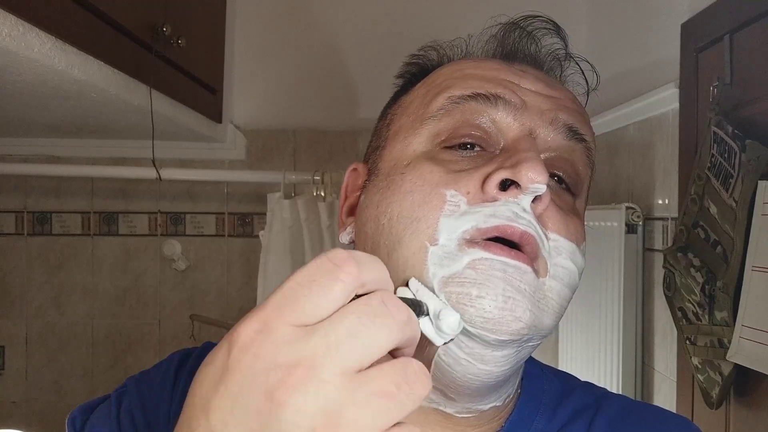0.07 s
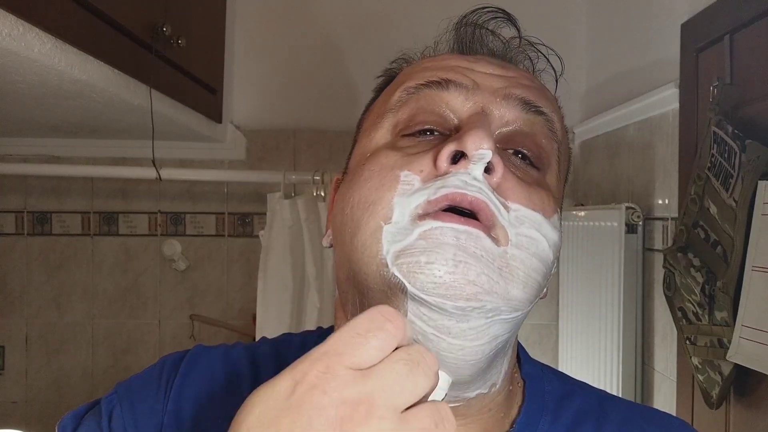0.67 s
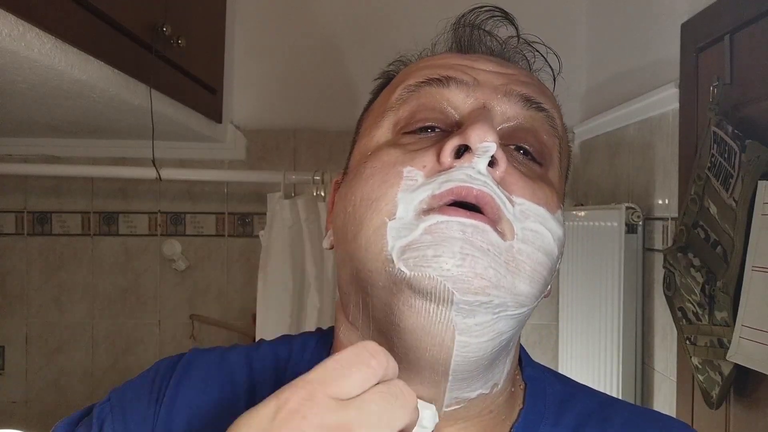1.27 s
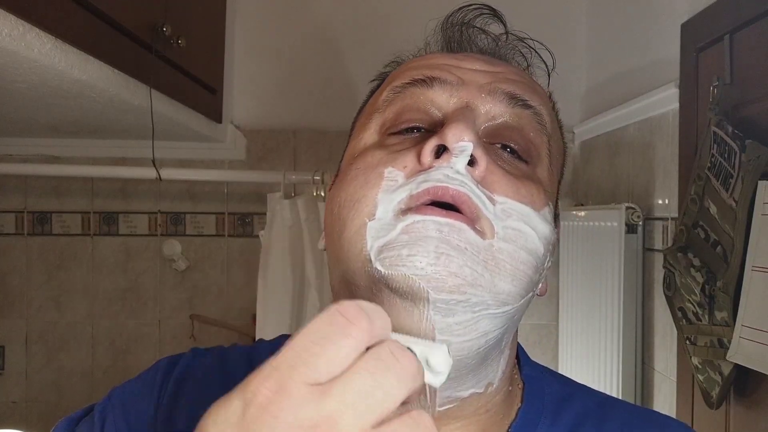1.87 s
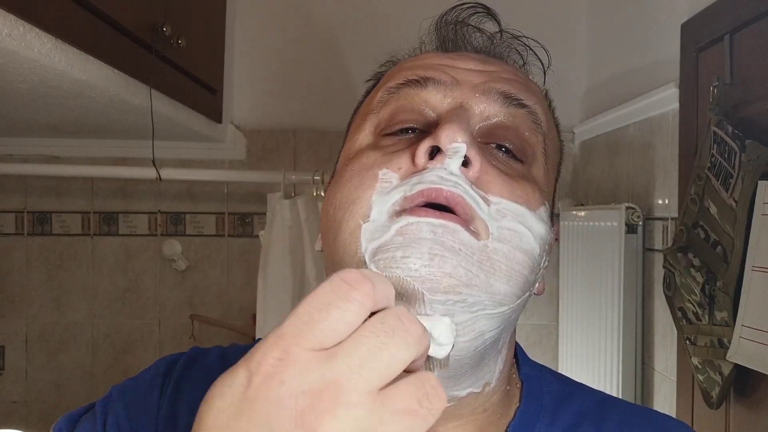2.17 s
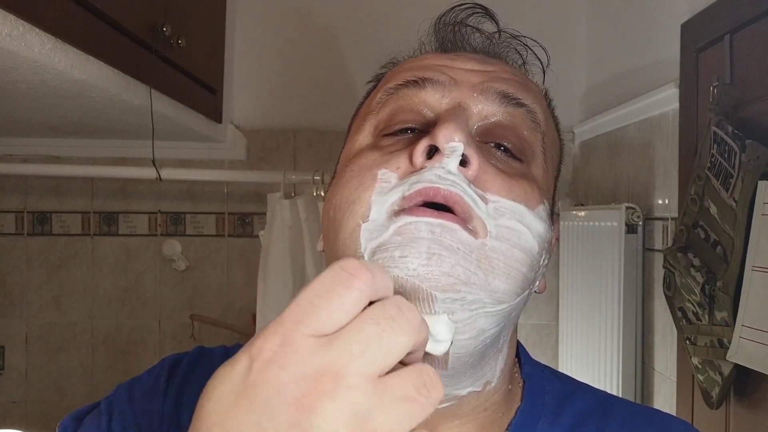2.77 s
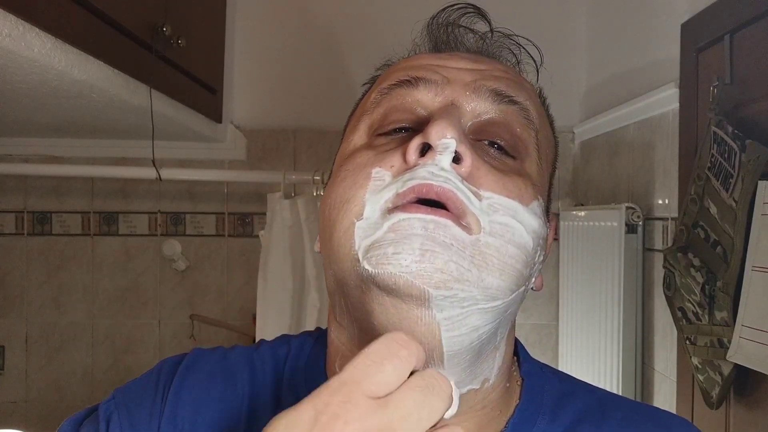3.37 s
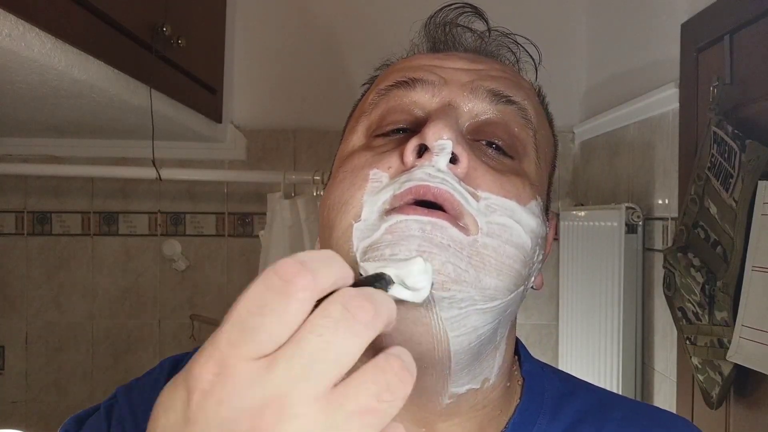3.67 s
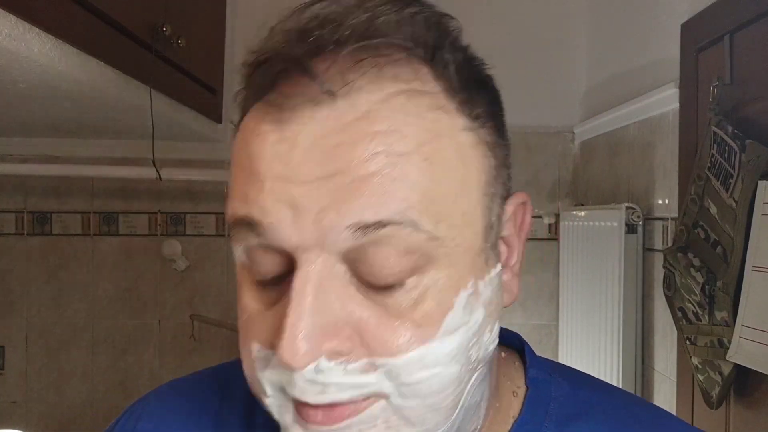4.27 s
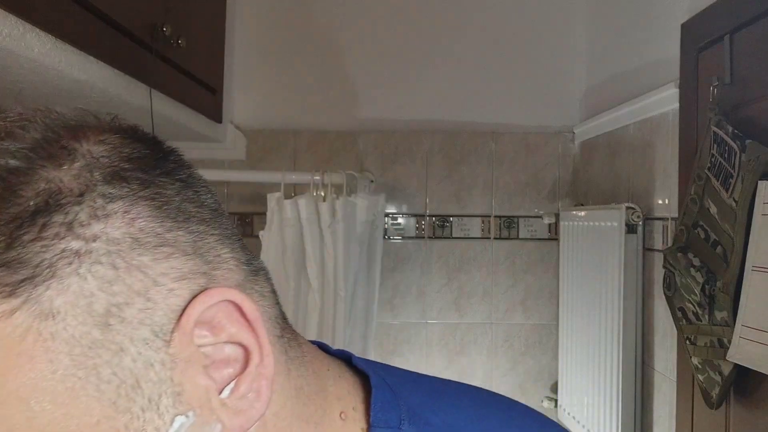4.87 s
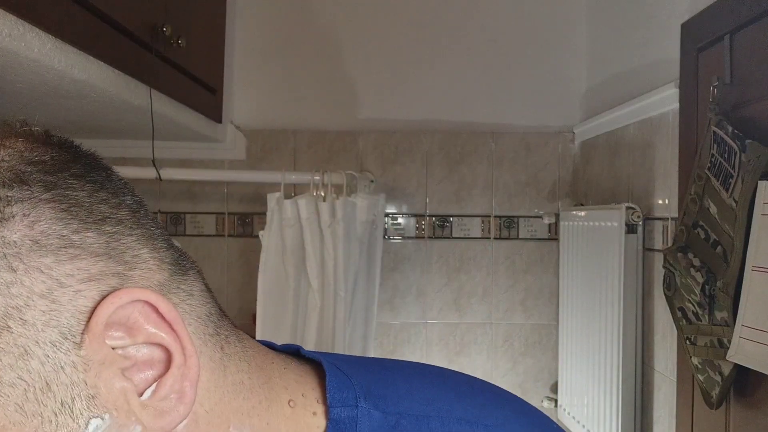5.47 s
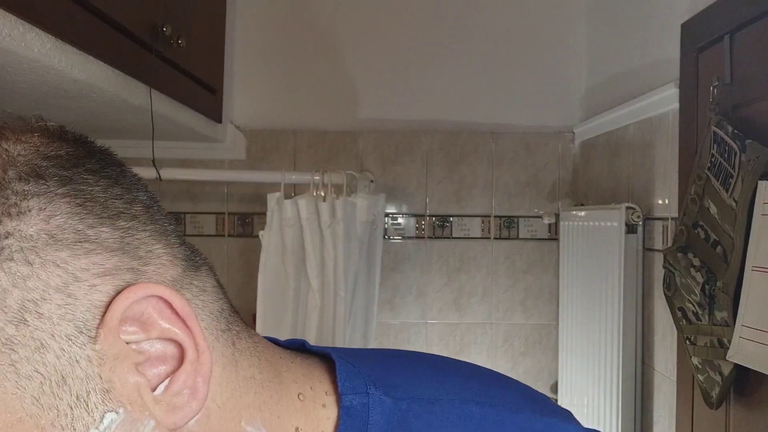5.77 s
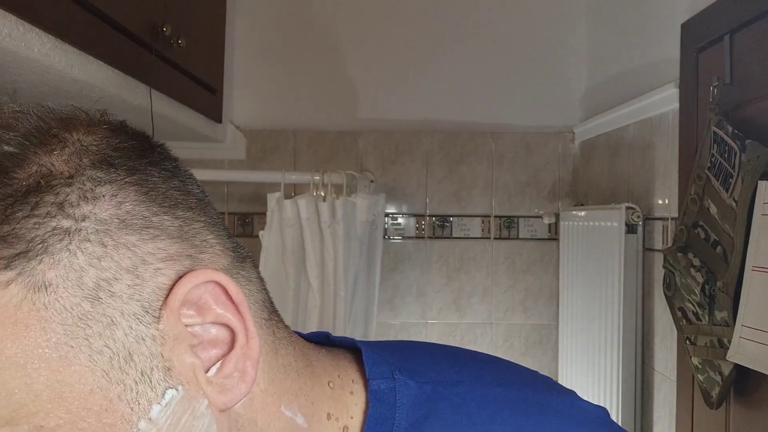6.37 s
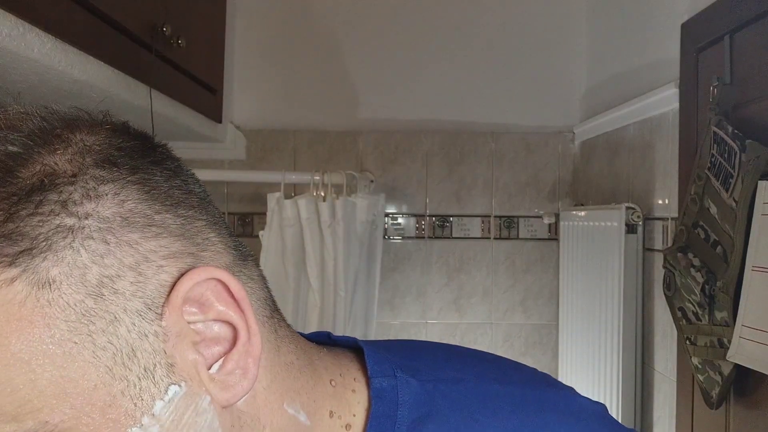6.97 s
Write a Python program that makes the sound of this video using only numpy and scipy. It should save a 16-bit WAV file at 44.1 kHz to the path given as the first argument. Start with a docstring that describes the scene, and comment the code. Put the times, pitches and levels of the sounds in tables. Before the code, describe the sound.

Close, short razor strokes rasp over stubble, followed by a few bumps on a basin and a hissing, spattering tap.

```python
"""In a small tiled bathroom, a razor scrapes through foam and stubble close to a phone's microphone.
Stick-slip friction gives the scrape, and snapping whiskers excite the resonances of the blades.
The hand swings away, pushing air at one microphone port; the shirt rustles and bumps ring the basin.
Then the tap is knocked open: the aerated jet hisses, spatters off the razor and traps air that
gurgles as it oscillates. Reflections from the tiles add a short reverberation."""
import sys
import numpy as np
from scipy import signal
from scipy.fft import rfft, irfft
from scipy.io import wavfile
from scipy.ndimage import uniform_filter1d

SR = 44100
rng = np.random.default_rng(int(sys.argv[2]) if len(sys.argv) > 2 else 0)


def bounce(signal):
    """Save signal as a 16-bit WAV file at the path given by the first command-line argument."""
    frames = np.transpose(np.atleast_2d(signal))
    limited = np.clip(frames, -1, 1)
    pcm = np.round(limited * 32767).astype(np.int16)
    wavfile.write(sys.argv[1], SR, pcm)


N = 309141
T = np.arange(N) / SR
MID_HZ, HIGH_HZ = (2000, 5000), (6000, 9000)  # bands in which noise levels are set
TAP_LEAK_S, TAP_OPEN_S, TAP_FULL_S = 5.05, 5.083, 5.212

# Spectral envelopes of the noises and ticks: f/Hz, level/dB
MURMUR_SPECTRUM = [(25, -23.5), (50, -19.5), (90, 0), (220, -0.5), (500, -6.5), (900, -15.5), (1500, -25.5),
                   (2800, -29.5), (4400, -29.5), (5400, -33), (6800, -30), (8200, -33.5), (12200, -37),
                   (15200, -29.5)]
CLOTH_SPECTRUM = [(400, 9), (900, 7.5), (1600, 0.5), (2400, -5), (3700, -1), (4500, -.5), (5500, -8.5),
                  (7000, 2), (8300, -4.5), (12200, -15), (15200, -13)]
SLEEVE_SPECTRUM = [(400, 6), (900, -3), (1600, -1), (2500, 0), (3600, 1.5), (4500, 0), (5500, -10.5),
                   (7000, 0), (8300, -10), (12200, -21), (15200, -18)]
JET_SPECTRUM = [(60, -27), (120, -18), (400, -2), (650, -4), (950, -3.5), (1550, -9), (2200, -2.5),
                (3200, -2), (4500, -2.5), (5000, -5.5), (5800, -6), (6500, 2.5), (7500, 0.5), (7900, 0.5),
                (8400, -7.5), (12400, -9), (14200, 0), (15600, -8.5)]
SPRAY_SPECTRUM = [(1500, -21), (3500, -0.5), (5300, -4.5), (6400, 6.5), (7600, 1), (8500, 2), (12000, -31),
                  (15000, -5)]
SPLASH_SPECTRUM = [(1500, -24), (2300, -7.5), (3100, -3), (4300, 1), (5300, -11), (9000, -21)]
TICK_SPECTRUM = [(1500, -20), (2700, -19), (3300, -10), (4000, -10), (4500, 1), (5400, 1), (6600, 4),
                 (7700, 4), (8600, -11), (13000, -22)]
DRAG_SPECTRUM = [(150, -5), (400, 3.5), (700, 0), (1050, -4.5), (1800, -2), (2500, -4), (3400, -1),
                 (4500, -1.5), (5400, -6.5), (6800, 1), (8200, -1), (12200, -7), (15200, -6.5)]
# Partials of the room's hum: f/Hz, level/dB
HUM_PARTIALS = [(102, -80), (221, -70.5), (371, -105), (500, -76.5)]
# Shirt rustles as the arm drops and the body bends: t/s, duration/s, level/dB
SHIRT_RUSTLES = [(3.79, 0.46, -66), (4.248, 0.19, -71), (4.477, .12, -68), (4.62, 0.27, -72.5)]
# Gusts from the moving hand: t/s, level/dB
HAND_GUSTS = [(1.743, -30), (1.776, -34), (1.819, -34), (1.977, -32.5), (4.129, -33.5), (4.144, -35),
              (4.176, -31.5), (4.196, -38), (4.292, -31), (4.301, -34.5)]
# Bumps on the basin and tap lever: t/s, level/dB, cutoff f/Hz
BASIN_BUMPS = [(4.489, -45.5, 750), (4.528, -38.5, 520), (4.553, -43.5, 398), (4.574, -42, 330),
               (4.603, -48, 232), (4.698, -55, 1200), (5.049, -44.5, 500), (5.064, -43, 330),
               (5.088, -48, 1000)]
# Slides of the hand on basin and lever: t/s, duration/s, level/dB, f/Hz
HAND_RUBS = [(4.488, 0.012, -54, 740), (4.53, .08, -51.5, 200), (4.53, .06, -56.5, 560),
             (4.697, .014, -52, 704), (4.72, .06, -64, 755)]
# Normal modes of the basin: f/Hz, level/dB, T60/s
BASIN_MODES = [(149, -5, .23), (199, -1, 0.21), (267, 2, 0.089), (344, -3.5, 0.09), (451, 1, 0.096),
               (590, 5, .04), (670, 2, .05), (750, 9, .038), (970, -4, .035)]
# Air pockets dug by the jet in pooled water: t/s, duration/s, level/dB, f/Hz
AIR_POCKETS = [(5.047, .014, -49.5, 610), (5.06, .014, -52, 245), (5.087, .02, -48, 740),
               (5.09, 0.019, -49.5, 983), (5.15, .17, -58.5, 1010), (5.212, .03, -50.5, 300),
               (5.264, 0.021, -47.5, 400), (5.297, 0.061, -48, 314), (5.788, 0.26, -49.5, 283.5),
               (6.001, 0.14, -54.5, 1290), (6.46, 0.14, -54, 200), (6.659, 0.058, -45.5, 196),
               (6.703, 0.041, -51.5, 310), (6.868, 0.15, -48.5, 268), (6.861, 0.15, -52.5, 462)]
# Drops, the loudest at 6.297 s ringing again thrice just after: t/s, level/dB, bubble f/Hz, amplitude ratio of
# smack to ring
DROP_IMPACTS = [(5.217, -27, 4200, .4), (5.231, -28, 2810, .4), (5.238, -28.5, 3800, .4),
                (5.316, -12.5, 7850, .6), (5.319, -20, 6500, 0.5), (5.337, -24, 6860, 0.5),
                (5.342, -22, 6460, .5), (5.349, -17, 8030, 0.5), (5.721, -25, 4000, .3),
                (5.834, -21, 6480, .7), (5.838, -26, 3640, .5), (5.876, -18.5, 7200, 0.2),
                (6.057, -27, 7350, .6), (6.112, -24, 6660, .4), (6.2969, -7, 6380, 0.25),
                (6.2994, -14, 5700, .05), (6.302, -18, 6000, 0.2), (6.315, -17, 6400, 0.2),
                (6.438, -19.5, 3120, 0.5), (6.4715, -21, 6720, 0.7), (6.513, -23.5, 3050, 0.2),
                (6.685, -25, 6597, .4)]
# Spatter as the razor crosses the jet: t/s, duration/s, spray level/dB, splash level/dB
SPATTER_FLURRIES = [(5.209, 0.027, -42, -43), (5.255, .04, -43, -54), (5.325, 0.019, -35.5, -51),
                    (5.822, 0.1, -40.5, -48), (6.052, .035, -41, -45), (6.296, 0.019, -38.5, -42),
                    (6.47, 0.094, -40.5, -44), (6.66, 0.07, -43, -42.5), (6.852, .17, -43.5, -41.5)]
# Contacts of the razor head: t/s, level/dB
HEAD_CONTACTS = [(.184, -27.5), (0.537, -20.5), (.545, -13.5), (.562, -22), (1.105, -37), (1.398, -19.5),
                 (1.407, -18)]
# Resonances of the blades: f/Hz, bandwidth/Hz, level/dB
BLADE_MODES = [(4460, 600, -11), (6280, 260, -2), (6830, 340, 1.5), (7270, 310, -1), (7550, 220, 1),
               (8400, 300, -7)]
# Razor strokes: t/s, duration/s, drag level/dB, cutting level/dB, thickest stubble at (share of
# stroke), its half-width/s, rasp level/dB, rasp f/Hz, landing time/s
RAZOR_STROKES = [(-.2, .28, -58.5, -50.5, 1, .15, -60, 2470, .023),
                 (0.117, 0.36, -68.5, -71, 0.37, 0.11, -82, 2080, 0.021),
                 (0.669, 0.32, -55.5, -44.5, 0.75, 0.062, -60, 2120, 0.042),
                 (1.433, .32, -54.5, -43.5, 0.81, 0.079, -70, 3600, 0.073),
                 (2.066, 0.24, -55.5, -46, .78, 0.08, -67, 3400, 0.024),
                 (2.658, 0.26, -55, -41.5, .82, 0.029, -83, 3130, 0.044),
                 (3.396, .27, -55.5, -44, 0.88, 0.044, -72, 3160, 0.028)]
# Microphone response, with a deep treble notch: f/Hz, level/dB
MIC_RESPONSE = [(20, 2), (8400, 1.5), (8900, -4.5), (9400, -22), (10000, -29), (11150, -49), (11650, 4),
                (16000, 0)]
# Its narrow peaks and dips: f/Hz, bandwidth/Hz, level/dB
MIC_RESONANCES = [(2077, 76, 1.5), (2440, 420, -2), (3130, 102, 1.5), (4710, 120, 4), (4950, 360, -6),
                  (5830, 230, -3), (7470, 160, 2.5), (7940, 190, -3.5), (8420, 126, 4), (8660, 200, -8.5)]


def undb(db):
    """Amplitude ratio: tenfold for every 20 dB."""
    return 10 ** (np.asarray(db) / 20)


def butterworth(x, order, hz, kind):
    """Filter with a maximally flat passband."""
    return signal.sosfilt(signal.butter(order, hz, kind, fs=SR, output="sos"), x)


def resonance(x, hz, width_hz):
    """Second-order resonator with unit gain at its centre."""
    return signal.lfilter(*signal.iirpeak(hz, hz / width_hz, fs=SR), x)


def colour(x, points, size=4096):
    """Minimum-phase filter through (f/Hz, level/dB) points, by folding the cepstrum."""
    hz, db = np.transpose(points)
    f = np.maximum(np.arange(size // 2 + 1) * SR / size, 1)
    skirt = np.minimum(f / hz[0], 1)
    cepstrum = irfft(np.log(skirt * undb(np.interp(np.log(f), np.log(hz), db))))
    cepstrum[1:size // 2] *= 2
    cepstrum[size // 2 + 1:] = 0
    response = irfft(np.exp(rfft(cepstrum)))
    return signal.fftconvolve(x, response.reshape((1,) * (x.ndim - 1) + (-1,)), axes=-1)[..., :N]


def unit(x, band=None):
    """Normalisation to rms 1, overall or within a band."""
    part = x if band is None else butterworth(x, 4, band, "band")
    return x / np.sqrt(np.mean(part ** 2))


def walk(rate):
    """Interpolated Gaussian noise: rate values a second, spread near 1."""
    hold = max(int(SR / rate), 1)
    steps = np.repeat(rng.standard_normal(N // hold + 1), hold)[:N]
    return np.sqrt(2) * uniform_filter1d(steps, hold)


def clicks(rate, spread_db):
    """Poisson process: rate impulses a second, with exponentially distributed levels."""
    sizes = undb(spread_db * np.minimum(rng.exponential(size=N), 5))
    return (rng.random(N) < rate / SR) * rng.choice([-1, 1], N) * sizes


def add(track, start, sound):
    """Superposition of a sound on a track, from start in seconds."""
    i = int(start * SR)
    track[i:i + len(sound)] += sound[:N - i]


def ring(hz, t60):
    """Free vibration of a damped oscillator, falling 60 dB in t60 seconds."""
    t = T[:int(t60 * SR) + 2]
    return np.sin(2 * np.pi * hz * t) * np.exp(-np.log(1000) * t / t60)


def envelope(start, length, attack_s, release_s):
    """Exponential rise from start, and exponential decay once length has passed."""
    age = np.maximum(T - start, 0)
    return (1 - np.exp(-age / attack_s)) * np.exp(-np.maximum(age - length, 0) / release_s)


def swell(middle_s, half_width_s):
    """Lorentzian rise and fall of gain."""
    return 1 / (1 + ((T - middle_s) / half_width_s) ** 2)


def bathroom(x, near_db, wet_db, pan_db, scatter_s=0.0037, direct=1):
    """Direct sound, early reflections and a reverberant tail whose bass is alike at both ports."""
    split_hz, bass_t60_s, treble_t60_s = 900, 0.38, 0.43
    t = T[:SR // 2]
    noise = rng.standard_normal((2, len(t)))
    treble = butterworth(noise, 2, split_hz, "high")
    bass = butterworth(0.93 * rng.standard_normal(len(t)) + 0.7 * noise, 2, split_hz, "low")
    near = treble * np.exp(-t / scatter_s)
    tail = (bass * undb(-60 * t / bass_t60_s) + treble * undb(-60 * t / treble_t60_s)) * (t > .007)
    response = sum(undb(db) * part / np.linalg.norm(part, axis=1, keepdims=True)
                   for db, part in ((near_db, near), (wet_db, tail)))
    response[:, 0] += direct
    response /= np.linalg.norm(response, axis=1, keepdims=True)
    pan = undb([[pan_db / 2], [-pan_db / 2]])
    return signal.fftconvolve(x[None], response, axes=1)[:, :N] * pan


def moving(x, count=6, drift_per_s=9, **room):
    """Changing interference: a moving source's reflections drift among several patterns."""
    shares = np.array([walk(drift_per_s) for _ in range(count)])
    shares /= np.linalg.norm(shares, axis=0)
    direct = np.array([x, np.roll(x, 5)])  # reaches the right port 5 samples later
    echoes = sum(share * bathroom(x, direct=0, **room) for share in shares)
    gain = np.linalg.norm(undb([room["near_db"], room["wet_db"]]))
    return (direct + gain * echoes) / np.hypot(1, gain)


def flow(valve_s=0.009, leak_db=-23.5, part_open_db=-3):
    """Throttling by the valve, as a share of full flow: it leaks, then opens in two steps."""
    leak, first, second = ((1 + np.tanh((T - start) / valve_s)) / 2
                           for start in (TAP_LEAK_S, TAP_OPEN_S, TAP_FULL_S))
    return undb(leak_db) * (leak - first) + undb(part_open_db) * (first - second) + second


def bubbles(start, length, middle_hz, pitch_spread, cycles=14, rise=0.074, rate=250):
    """Minnaert resonance: a run of damped bubbles, each rising in pitch; rms near 1 while it lasts."""
    track = np.zeros(N)
    for when, pitch, size in rng.random((int(rate * length) + 1, 3)):
        hz = middle_hz * np.exp(pitch_spread * (2 * pitch - 1))
        turns = T[:int(2 * cycles / hz * SR)] * hz
        fade = (1 - np.exp(-2 * turns)) * np.exp(-np.log(100) * turns / cycles)
        chirp = np.sin(2 * np.pi * turns * (1 + rise * turns / cycles / 2))
        add(track, min(start + when * length, T[-1]), undb(13.8 * size ** 3) * fade * chirp)
    return unit(track) * np.sqrt(length / T[-1])


def room_tone():
    """Ambient noise, partly coherent between the ports: house murmur, thin hiss and wavering hum."""
    murmur = unit(colour(rng.standard_normal(N), MURMUR_SPECTRUM))
    incoherent = unit(colour(rng.standard_normal((2, N)), MURMUR_SPECTRUM))
    hum = sum(undb(db + 2 * walk(6)) * np.sqrt(2) * np.sin(2 * np.pi * hz * T + 0.51 * walk(7))
              for hz, db in HUM_PARTIALS)
    murmur *= undb(-55.5 + 0.28 * walk(3.88))
    shared = bathroom(murmur, near_db=9.5, wet_db=-14, pan_db=2, scatter_s=0.035) + hum
    return shared + incoherent * undb([[-62.5], [-65]])


def shirt(fade_s=0.024):
    """Sliding friction of cloth on cloth gives a fine, soft crackle."""
    sliding = sum(undb(db) * envelope(start, length, fade_s, fade_s)
                  for start, length, db in SHIRT_RUSTLES)
    fibres = unit(colour(clicks(rate=6400, spread_db=3) * undb(walk(13)), CLOTH_SPECTRUM), MID_HZ)
    return bathroom(sliding * fibres, near_db=5.5, wet_db=-2.5, pan_db=0.5, scatter_s=0.006)


def sleeve_swish(level_db=-43):
    """Friction noise: a sleeve swishes briefly as the arm drops."""
    swish = unit(colour(clicks(rate=5000, spread_db=0.5), SLEEVE_SPECTRUM), MID_HZ)
    swish *= undb(level_db) * swell(middle_s=4.162, half_width_s=0.029)
    return moving(swish, count=10, drift_per_s=16, near_db=8, wet_db=-9, pan_db=0, scatter_s=0.0069)


def air_puffs(swing_hz=118, half_width_s=0.0045, eddy_hz=240, eddy_db=-13):
    """Pseudo-sound: each gust is a swing of pressure on the left port, fluttering with small eddies."""
    track = np.zeros(N)
    t = T[:int(6 * half_width_s * SR)] - 3 * half_width_s
    turbulence = resonance(rng.standard_normal(N), eddy_hz, 180)
    eddies = undb(eddy_db) * unit(resonance(turbulence, eddy_hz, 180))
    for middle, db in HAND_GUSTS:
        swing = np.cos(2 * np.pi * (swing_hz * t + rng.random())) + eddies[int(middle * SR):][:len(t)]
        add(track, middle + t[0], undb(db) * np.exp(-(t / half_width_s) ** 2) * swing)
    track = butterworth(track, 3, 55, "high")
    return np.array([track, undb(-43) * track])


def basin_knocks():
    """Impacts excite the basin's modes, duller for softer contact; the hand rubs by stick-slip."""
    track = np.zeros(N)
    for start, db, cutoff_hz in BASIN_BUMPS:
        for hz, mode_db, t60 in BASIN_MODES:
            gain = undb(db + mode_db) / (1 + (hz / cutoff_hz) ** 2)
            mode = ring(hz * (1 + 0.028 * rng.standard_normal()), t60)
            add(track, start, gain * mode * rng.choice([-1, 1]))
    slips = clicks(rate=1100, spread_db=0)
    for start, length, db, hz in HAND_RUBS:
        rub = unit(resonance(resonance(slips, hz, 310), hz, 310))
        track += undb(db) * envelope(start, length, 0.0061, 0.012) * rub
    return bathroom(butterworth(track, 2, 90, "high"), near_db=5, wet_db=-3.5, pan_db=0)


def spout_gulp(start_s=5.048, level_db=-44, from_hz=480, to_hz=350, fall_s=.02, t60_s=.33):
    """Cavity resonance: air in the spout rings unsteadily and sinks in pitch as the water arrives."""
    age = np.maximum(T - start_s, 0)
    hz = to_hz + (from_hz - to_hz) * np.exp(-age / fall_s)
    tone = np.sin(2 * np.pi * np.cumsum(hz * (age > 0)) / SR)
    tone *= undb(level_db - 60 * age / t60_s + 2 * walk(120))
    return bathroom(tone, near_db=-13, wet_db=-14, pan_db=5)


def pipe_hum(hz=106.7, onset_db=-49.5, running_db=-70.5):
    """Flow-induced vibration: the pipe hums as the flow builds, then faintly while the water runs."""
    shudder = undb(onset_db) * envelope(start=5.13, length=.05, attack_s=.008, release_s=.085)
    shudder += undb(running_db) * flow() * walk(40)
    return shudder * undb(2 * walk(30)) * np.sqrt(2) * np.sin(2 * np.pi * hz * T + .5 * walk(25))


def gurgle():
    """Air entrainment: pockets ring where the jet plunges in, at times gathering into a gurgle."""
    steady = undb(-58) * flow() * bubbles(TAP_OPEN_S, T[-1] - TAP_OPEN_S, 393, pitch_spread=0.42)
    pockets = sum(undb(db) * bubbles(start, length, hz, pitch_spread=0.12, cycles=17)
                  for start, length, db, hz in AIR_POCKETS)
    return bathroom(steady + pockets, near_db=-0.5, wet_db=-7.5, pan_db=-0.5)


def drops(smack_s=0.00042, ring_cycles=60, lowest_hz=2200):
    """Impact and bubble resonance: a drop smacks and traps air, too small a source to radiate bass."""
    track = np.zeros(N)
    for start, db, hz, smack in DROP_IMPACTS:
        bubble = ring(hz, ring_cycles / hz)
        impact = smack * rng.standard_normal(len(bubble)) * np.exp(-T[:len(bubble)] / smack_s)
        impact = resonance(impact, hz, 3600)  # small drops smack high, fat ones lower
        add(track, start, undb(db) * (bubble + impact))
    return bathroom(butterworth(track, 2, lowest_hz, "high"), near_db=0.5, wet_db=-3, pan_db=-0.5)


def jet(fizz_db=-42.5, spatter_db=-43.5, tinkle_db=-43, tinkle_hz=3493):
    """Shot noise: the aerated stream fizzes and spatters in flurries, while tiny bubbles tinkle."""
    fizz = unit(colour(clicks(rate=16000, spread_db=3) * undb(walk(70)), JET_SPECTRUM), MID_HZ)
    spray = unit(colour(clicks(rate=2000, spread_db=3) * undb(1.25 * walk(80)), SPRAY_SPECTRUM), HIGH_HZ)
    splash = unit(colour(clicks(rate=2000, spread_db=3) * undb(1.5 * walk(90)), SPLASH_SPECTRUM), MID_HZ)
    spraying, splashing = np.zeros((2, N))
    for start, length, spray_db, splash_db in SPATTER_FLURRIES:
        flurry = envelope(start, length, attack_s=0.0046, release_s=0.03)
        spraying += undb(spray_db) * flurry
        splashing += undb(splash_db) * flurry
    tinkle = bubbles(TAP_FULL_S, T[-1] - TAP_FULL_S, tinkle_hz, pitch_spread=0.25, cycles=21, rate=1000)
    stream = undb(fizz_db) * flow() * fizz + undb(tinkle_db) * tinkle + splashing * splash
    spatter = np.hypot(undb(spatter_db) * flow(), spraying) * spray  # steady and flurry powers add
    return (moving(stream, near_db=6, wet_db=3, pan_db=-1.5, scatter_s=0.0066)
            + moving(spatter, near_db=13, wet_db=1.5, pan_db=4.5, scatter_s=0.003))


def razor_ticks():
    """Impulsive excitation: the plastic head ticks as it lands or catches."""
    track = np.zeros(N)
    for start, db in HEAD_CONTACTS:
        add(track, start, undb([db]))
    return bathroom(colour(track, TICK_SPECTRUM), near_db=7, wet_db=-4, pan_db=2.5, scatter_s=0.0045)


def razor(press_db=7, lift_s=0.024):
    """Friction and fracture: the head drags over foamy skin while snapping whiskers ring the blades."""
    drag, cut, rasp = np.zeros((3, N))
    # the head catches on the skin and rasps at a pitch set by its angle
    catches = clicks(rate=1500, spread_db=3) * undb(2 * walk(150))
    for start, length, drag_db, cut_db, thickest, half_width, rasp_db, rasp_hz, land_s in RAZOR_STROKES:
        # a stroke lands lightly, presses harder as it goes and lifts off quickly
        to_go = np.clip(1 - (T - start) / length, 0, 1)
        pressure = envelope(start, length, land_s, lift_s) * undb(-press_db * to_go ** 2)
        scrape = unit(resonance(resonance(catches, rasp_hz, 780), rasp_hz, 780))
        rasp += undb(rasp_db) * pressure * scrape
        drag += undb(drag_db) * pressure
        cut += undb(cut_db) * pressure * swell(start + thickest * length, half_width)
    grain = clicks(rate=6000, spread_db=2) * undb(1.3 * walk(180))
    foam = unit(colour(grain, DRAG_SPECTRUM), MID_HZ)
    # whiskers stand in clumps, so the snaps come in uneven bunches
    snaps = clicks(rate=2800, spread_db=0) * undb(2.3 * walk(220))
    blades = sum((-1) ** k * undb(db) * resonance(snaps, hz, width)
                 for k, (hz, width, db) in enumerate(BLADE_MODES))
    rubbing = moving(drag * foam + rasp, count=10, drift_per_s=16,
                     near_db=8, wet_db=-9, pan_db=0, scatter_s=0.0069)
    cutting = moving(cut * unit(blades, HIGH_HZ), near_db=6, wet_db=-14, pan_db=4, scatter_s=0.012)
    return rubbing + cutting


def scene():
    """Linear superposition of shaving, movement and running water over the room's ambient noise."""
    shaving = razor() + razor_ticks()
    movement = air_puffs() + shirt() + sleeve_swish() + basin_knocks()
    water = spout_gulp() + jet() + gurgle() + pipe_hum() + drops()
    return shaving + movement + water + room_tone()


def record(dry, top_hz=15850):
    """Frequency response of the phone's microphone: broad colour, narrow ripples and a steep top cut."""
    sound = colour(dry, MIC_RESPONSE)
    for hz, width, db in MIC_RESONANCES:
        sound = sound + (undb(db) - 1) * resonance(sound, hz, width)
    return signal.sosfilt(signal.ellip(10, .2, 70, top_hz, fs=SR, output="sos"), sound)


dry = scene()
out = record(dry)
bounce(out)
```